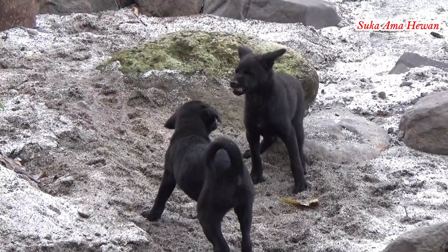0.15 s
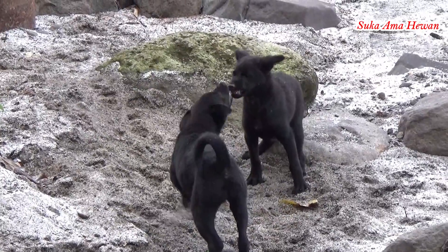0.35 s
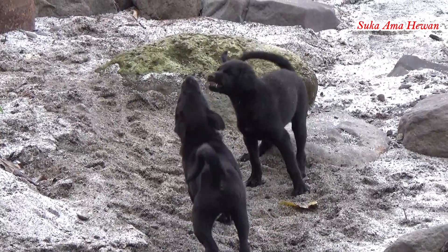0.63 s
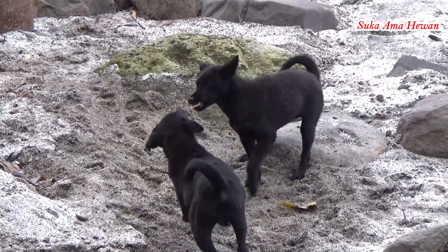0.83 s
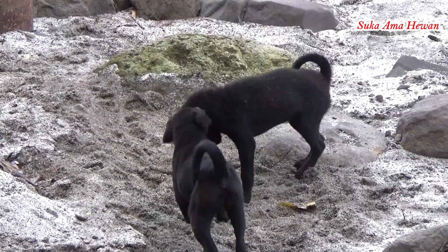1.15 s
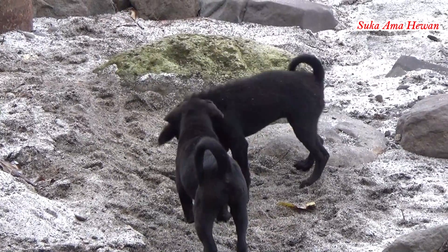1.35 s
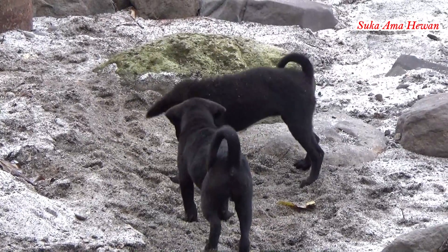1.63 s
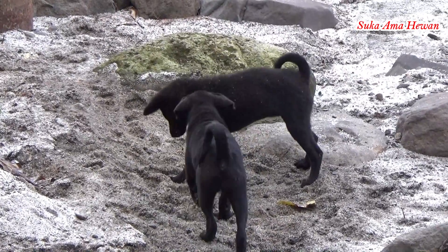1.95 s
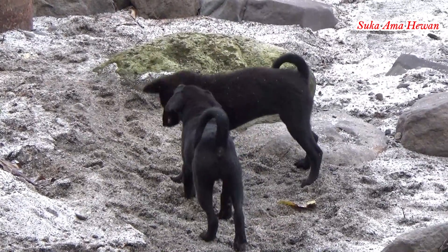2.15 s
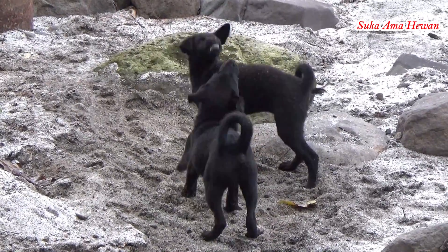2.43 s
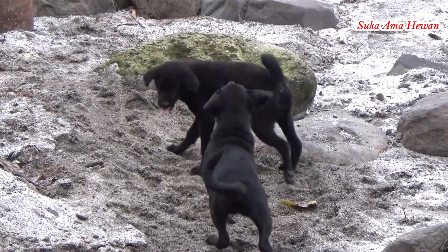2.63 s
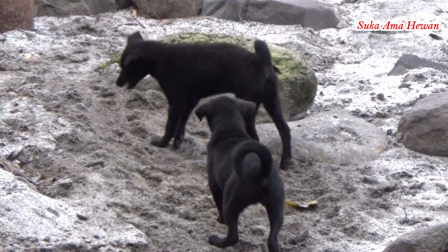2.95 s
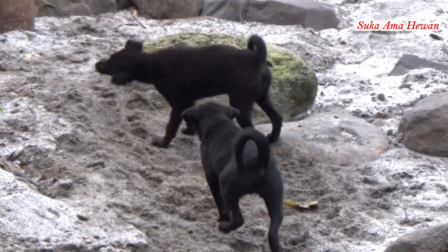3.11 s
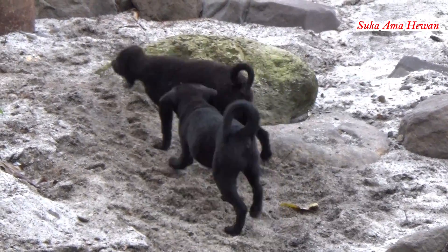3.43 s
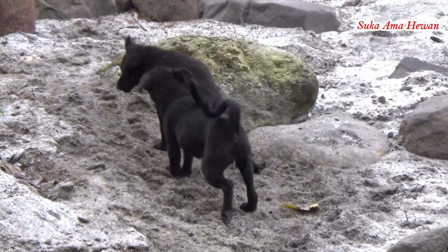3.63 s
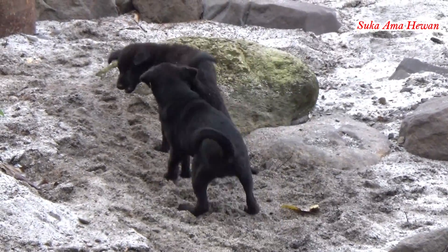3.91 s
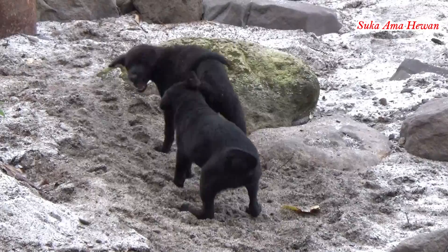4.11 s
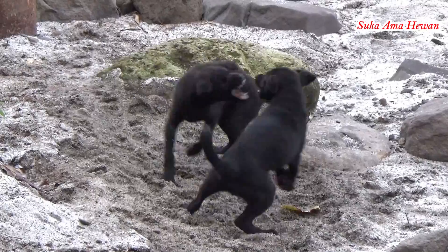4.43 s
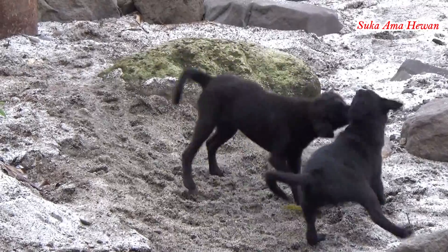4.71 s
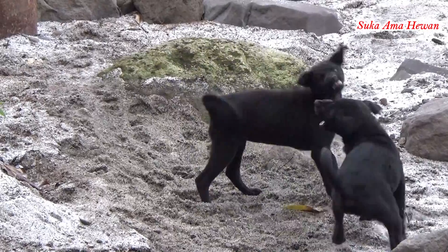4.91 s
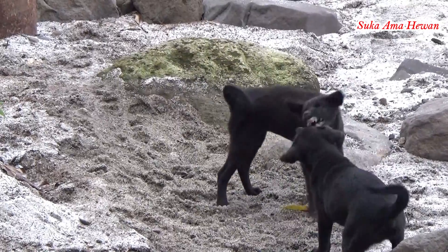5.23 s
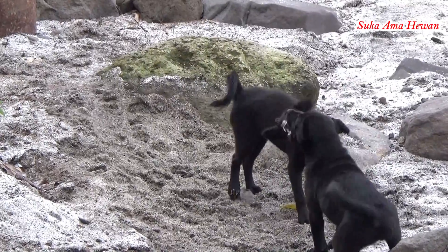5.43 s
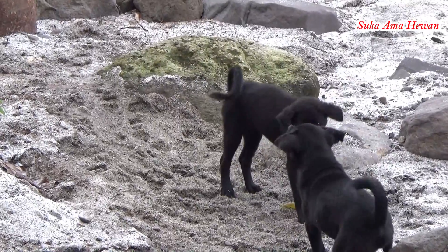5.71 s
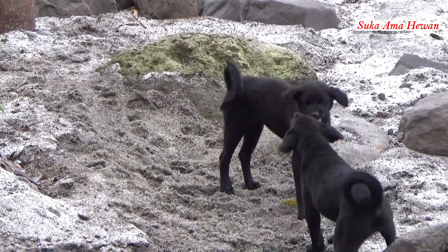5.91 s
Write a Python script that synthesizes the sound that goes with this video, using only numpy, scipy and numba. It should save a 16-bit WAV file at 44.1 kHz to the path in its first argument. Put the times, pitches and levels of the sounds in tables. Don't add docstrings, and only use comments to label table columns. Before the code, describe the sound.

Short hoarse barks burst out between throaty growls and breathy snorts as two young dogs tussle on sand, with faint distant wind and traffic.

```python
import sys
import numpy as np
from scipy import signal
from scipy.io import wavfile
from scipy.ndimage import uniform_filter1d
from numba import njit

SR = 44100
rng = np.random.default_rng(int(sys.argv[2]) if len(sys.argv) > 2 else 0)


def makeup_ratio(level_db):
    decades = np.asarray(level_db, float) / 20
    return 10 ** decades


def store_pcm(level_fs):
    pcm = np.round(np.clip(level_fs, -1, 1) * 32767).astype(np.int16)
    wavfile.write(sys.argv[1], SR, np.atleast_2d(pcm).T)


N = 267246

# f/Hz, level/dB [per Hz]
HUSH_SPECTRUM = [(15, -73), (25, -57), (86, -8), (188, -4), (227, -15), (411, -8), (445, -8), (538, -5.5),
                 (583, -3.5), (742, -6), (1080, -5), (1710, -9.5), (2180, -9.5), (7120, -15.5),
                 (15500, -21)]
# f/Hz, side minus mid level/dB
HUSH_WIDTH = [(60, -20), (110, -36), (200, -14), (380, -4.5), (700, -4), (1290, -2), (2380, -2.5),
              (4400, -8), (8120, -7.5), (15000, -20)]
# t/s, level/dB
HUSH_SWELL = [(0, 2.5), (.7, -0.5), (1.6, -0.24), (3.3, -0.55), (4.2, 0), (6.06, 3)]
# f/Hz, level/dB
MACHINE_HUM = [(719, -77.5), (194, -85.5)]
# t/s, peak level/dB, f/Hz
PAW_TICKS = [(0.4589, -48, 8400), (1.9096, -54, 2750), (1.94, -46, 2920), (2.379, -50, 1790),
             (4.2888, -34, 1960), (4.3054, -41.5, 1890), (4.3564, -36, 1810), (4.417, -41, 1810),
             (4.594, -38, 2550), (4.732, -45, 3000), (4.763, -46, 2507), (4.873, -48, 1797)]
# peak t/s, rise t/s [per 20 dB], fall t/s [per 20 dB],
# level/dB, lower hiss level/dB [re the upper]
BREATHS = [(0.0, .1, .1, -62.5, -7), (0.46, .03, .35, -66, -6), (0.9, -0.1, 0.8, -74, -1.5),
           (1.2, 0.3, 0.2, -73, -3), (1.42, 0.18, 0.14, -62.5, -2.5), (2.4, .05, 0.3, -67, -4),
           (2.7, 0.4, 0.24, -66, -4), (3.745, 1.5, 0.8, -74.5, -7), (4.31, 0.1, 0.3, -60.5, -2.5),
           (4.42, 0.06, 1, -67, 3), (4.596, -0.05, 0.18, -58.5, -12), (5.0, 0.56, 0.3, -63, -9),
           (5.345, 0.23, 0.15, -59, -4), (5.55, .5, 0.25, -63, -2.5), (5.755, 0, 0.2, -61.5, -5),
           (5.96, -0.5, 0, -67, 0)]
# f/Hz, width f/Hz, level/dB
TEETH_RESONANCES = [(8200, 950, 6), (9500, 2400, 7), (11100, 4800, -10)]
# peak t/s, rise t/s [20 dB], fall t/s [20 dB], level/dB,
# f/Hz
WHINE_TONES = [(0.54, 0.066, -0.14, -63, 1100), (1.92, .13, 0.2, -69, 1014), (3.86, .1, -0.1, -72, 649),
               (4.525, .022, -0.01, -45.5, 1020), (4.575, .05, 0, -51.5, 1003),
               (4.94, .03, 0.05, -42.5, 1150), (5.1, .06, 0, -44, 1040), (5.61, 0.072, 0, -59, 1239),
               (5.855, -0.08, -0.1, -33, 1108), (3.75, .06, 0.07, -68, 1681)]
# peak t/s, rise t/s [per 20 dB], fall t/s [per 20 dB], mouth level/dB, mouth f/Hz
GROWL_SWELLS = [(0.535, 0.1, 0.18, -62.5, 1090), (0.9, -0.03, .1, -53, 950), (1.18, 0.08, 0.1, -52.5, 1020),
                (2.383, 0, 0.06, -57.5, 1180), (2.53, 0.08, 0.17, -51.5, 1049),
                (2.68, 0.1442, 0.0952, -46.5, 920), (2.73, 0.1, 0.09, -48, 1100),
                (3.68, 0.09, 0.04, -57.5, 1100), (3.75, 0.25, 0, -62.5, 1301), (4.28, 0.09, 0.6, -55, 1230),
                (4.53, 0.29, 0.07, -50, 1090), (4.58, 0.11, -0.06, -50.5, 1100),
                (4.76, 0.73, -0.5, -64, 1100), (4.878, -0.18, -2.3, -56, 1130),
                (4.94, 0.0649, 0.22, -45, 1151), (5.03, 0.1344, 0, -44.5, 1115),
                (5.22, 0.26, 0.22, -48, 1100), (5.35, 0.09, 0.07, -37, 1134), (5.51, 0.17, 0.14, -51, 1227),
                (5.62, .3, 0, -57.5, 1212), (5.95, 0.03, -0.3, -49, 960), (6.06, .25, 4, -51.5, 1100)]
# start t/s, length up to the release t/s, mouth level/dB, pitch f/Hz, mouth f/Hz
BARK_EVENTS = [
    (0.766, 0.072, -26, 458, 1014),
    (1.068, 0.067, -31, 420, 1140),
    (2.42, 0.066, -25.5, 435, 1095),
    (3.603, 0.049, -43.5, 334.2, 1030),
    (5.048, .07, -27, 368.7, 1032),
    (5.817, .082, -21.5, 548, 1145),
]
BARK_ROUGHNESS = [.44, .4, .46, .55, .6, .44]
# top t/s [after the start], bend over the top [1/s^2]
PITCH_ARCHES = [(.04, 12), (.047, 95), (.045, 60), (.04, 15), (.05, 50), (.036, 95)]
# 2nd resonance f/Hz, 2nd level/dB, 3rd level/dB, teeth air level/dB, lip air level/dB
BARK_JAWS = [(1736, -2, -10.5, -57.5, -67.5), (1854, 1, -10, -50.5, -62), (1790, -5.5, -12, -54.5, -63),
             (1900, -8.5, -12.5, -73, -64.5), (1867, -3, -22.5, -54, -53.5),
             (1751.5, -3.5, -16.5, -45.5, -75)]

PUSH_S = 0.033


def unit(x, span_s=0.):
    power = uniform_filter1d(x ** 2, int(span_s * SR)) if span_s else np.mean(x ** 2)
    return x / np.sqrt(np.maximum(power, 1e-12))


def play(table):
    times, *columns = np.array(table).T
    return [np.interp(np.arange(N) / SR, times, column) for column in columns]


@njit
def svf(x, gs, ks):
    y, b, l = np.empty(len(x)), 0., 0.
    for i in range(len(x)):
        g, k = gs[i], ks[i]
        v = (b + g * (x[i] - l)) / (1 + g * (g + k))
        b, l, y[i] = 2 * v - b, l + 2 * g * v, k * v
    return y


def band(x, hz, width_hz, count=1):
    hz = np.clip(hz, 20, 18000)
    g = np.tan(np.pi * hz / SR) * np.ones(N)
    k = max(float(width_hz), 10.) / hz * np.ones(N)
    for _ in range(count):
        x = svf(x + 1e-18, g, k)
    return x


def walk(rate):
    k = int(SR / rate)
    held = np.repeat(rng.standard_normal(N // k + 1), k)
    return 1.3 * uniform_filter1d(uniform_filter1d(held, k), k)[:N]


def hush():
    def at(table, hz):
        table_hz, db = np.array(table).T
        return np.interp(np.log(hz), np.log(table_hz), db)

    bed = 0
    for hz in 28 * 2 ** np.arange(0, 9.3, 1 / 3):
        mid, side = (band(rng.standard_normal(N), hz, hz / 2, count=2) for _ in range(2))
        db = at(HUSH_SPECTRUM, hz) + .5 * walk(6)
        wide = makeup_ratio(at(HUSH_WIDTH, hz)) * side * np.array([[1], [-1]])
        bed = bed + makeup_ratio(db) * (mid + wide)
    hum = sum(makeup_ratio(db) * unit(band(rng.standard_normal(N), hz, 30)) for hz, db in MACHINE_HUM)
    return makeup_ratio(-62.5 + play(HUSH_SWELL)[0]) * unit(bed) + hum


@njit
def walls(x, lags, gain, damp):
    line, soft, out = np.zeros((8, 4096)), np.zeros(8), np.zeros((2, len(x)))
    for i in range(len(x)):
        total = 0.
        for k in range(8):
            soft[k] += (1 - damp) * (gain[k] * line[k, (i - lags[k]) & 4095] - soft[k])
            total += soft[k]
            out[k % 2, i] += soft[k]
        for k in range(8):
            line[k, i & 4095] = x[i] + soft[k] - total / 4
    return out


def grit():
    out, t = np.zeros(N), np.arange(600) / SR
    scatter = rng.standard_normal((len(PAW_TICKS), 600))
    for (s, db, hz), sand in zip(PAW_TICKS, scatter):
        i = int(s * SR)
        ring = np.exp(-t / 0.0011) * np.sin(2 * np.pi * hz * t)
        out[i:i + 600] += makeup_ratio(db) * (ring + 0.4 * np.exp(-t / 0.004) * sand)
    return band(out, 4700, 11500, count=2)


def swells(rows, order=1):
    s, rise_s, fall_s, db, last = np.array(rows, np.float32).T[:, :, None]
    since = np.arange(N, dtype=np.float32) / SR - s
    rising, falling = -since / np.maximum(rise_s, .004), since / np.maximum(fall_s, .004)
    drop = 20 * np.where(since < 0, rising, falling) ** order
    top = np.argmax(db - drop, axis=0)
    drop = np.minimum(drop[top, np.arange(N)], 90.)
    return db[top, 0] - drop, drop, uniform_filter1d(last[top, 0], SR // 100)


def effort(late_s, push_db, release_db_per_s):
    events = np.array(BARK_EVENTS)
    t = np.arange(N) / SR - late_s
    which = np.maximum(np.searchsorted(events[:, 0] - .02, t) - 1, 0)
    since = t - events[which, 0]
    past = np.maximum(since - events[which, 1], 0)
    snap_db = 40 * np.minimum(since / 0.014, 0)
    pushing_db = push_db * np.clip(1 - since / PUSH_S, 0, 1)
    return which, since, past, np.maximum(snap_db + pushing_db - release_db_per_s * past, -90)


def breath():
    def air():
        return makeup_ratio(2.1 * walk(150)) * rng.standard_normal(N)

    level_db, _, lower_db = swells(BREATHS)
    jaws = np.array(BARK_JAWS)
    which, _, _, under_db = effort(0.0063, -13.5, 486)
    blown = makeup_ratio(jaws[which, 3] + under_db)
    early, _, _, early_db = effort(0, -1.5, 630)
    puffed = makeup_ratio(jaws[early, 4] + early_db)
    lips_hz = 5220 * np.exp(0.11 * walk(8))
    teeth = 0
    for hz, width_hz, db in TEETH_RESONANCES:
        teeth = teeth + makeup_ratio(db) * band(air(), hz * np.exp(0.067 * walk(40)), width_hz, count=2)
    lips = unit(band(air(), lips_hz, 1200, count=2))
    return (makeup_ratio(level_db) + blown) * unit(teeth) + (makeup_ratio(level_db + lower_db) + puffed) * lips


def whines():
    db, drop, hz = swells(WHINE_TONES, order=2)
    hz = hz * (1 - .0015 * np.minimum(drop, 20))
    level = makeup_ratio(db + 5.5 + 2.7 * walk(60))
    return level * np.sin(2 * np.pi * np.cumsum(hz * (1 + .015 * walk(55))) / SR)


@njit
def folds(hz, rough, jitter, shimmer):
    pulses, phase, p, k = np.zeros(len(hz) + 1), np.empty(len(hz)), 0., 0
    for i in range(len(hz)):
        step = hz[i] * np.exp(rough[i] * jitter[k]) / SR
        p += step
        if p >= 1:
            p, k = p - 1, k + 1
            size = np.exp(rough[i] * shimmer[k])
            pulses[i] += size * p / step
            pulses[i + 1] += size * (1 - p / step)
        phase[i] = p
    return pulses[:-1], phase


def larynx(hz, rough, jitter, shimmer, puff, bright):
    chance = rng.standard_normal((N // 40, 2)).T
    pulses, phase = folds(hz, rough, jitter * chance[0], shimmer * chance[1])
    air = rng.standard_normal(N)
    air = air + bright * np.diff(air, prepend=0)
    source = unit(pulses, .03) + rough * unit(np.exp(-phase / puff)) * air
    lag = int(0.000923 * SR)
    return source + 0.05 * np.roll(source, lag)


def throat(source, controls, widths_hz, hold_s, top_db):
    mouth_db, second_db, third_db, *moving_hz = controls
    source = signal.sosfilt(signal.butter(7, (675, 4450), "band", fs=SR, output="sos"), source)
    mouth, second, third, top = (unit(band(source, hz, width_hz, count=2), hold_s)
                                 for hz, width_hz in zip(moving_hz, widths_hz))
    cheek = makeup_ratio(-14) * unit(band(source, 760, 180, count=2), hold_s)
    upper = makeup_ratio(2.9 * walk(90)) * third - makeup_ratio(top_db + 0.73 * walk(70)) * top
    return makeup_ratio(mouth_db) * (mouth - cheek - makeup_ratio(second_db) * second + makeup_ratio(third_db) * upper)


def growls():
    mouth_db, _, mouth_hz = swells(GROWL_SWELLS)
    weak = np.clip(-52 - mouth_db, -15, 18)
    gape = mouth_hz - 1100
    second_db = -7.5 + 0.13 * weak + 0.0395 * gape
    third_db = -15 + 0.55 * weak + 0.0308 * gape
    chest_db = -13.5 + 0.74 * weak
    second_hz = 1848 * np.exp(0.042 * walk(7))
    third_hz = (2815 + 1.5 * gape) * np.exp(0.042 * walk(7))
    flap_hz = 150 * np.exp(.12 * walk(11))
    source = larynx(flap_hz, np.full(N, .9), jitter=.3, shimmer=0.73, puff=1.0, bright=6.7)
    chest = band(source, 184.5, 112, count=2) + 0.84 * band(source, 326, 200, count=2)
    mouth_hz, second_hz = (hz * np.exp(0.049 * walk(30)) for hz in (mouth_hz, second_hz))
    controls = (mouth_db, second_db, third_db, mouth_hz, second_hz, third_hz, 4000)
    voice = throat(source, controls, (330, 394, 670, 1100), hold_s=0.086, top_db=-8.5)
    return voice + makeup_ratio(mouth_db + chest_db) * unit(chest, 0.072)


def barks():
    which, since, past, under_db = effort(0, -12, 736)
    db, hz, mouth_hz = np.array(BARK_EVENTS)[which, 2:].T
    second_hz, second_db, third_db = np.array(BARK_JAWS)[which, :3].T
    top_s, bend = np.array(PITCH_ARCHES)[which].T
    since, past = np.clip(since, 0, .12), np.minimum(past, .1)

    hz = hz * np.exp(-bend * np.minimum(since - top_s, .06) ** 2 - 1.5 * past)
    mouth_hz = mouth_hz * np.exp(-4.2 * past - 0.93 * bend * np.clip(since - top_s, 0, .06) ** 2)
    top_hz = 4150 * np.exp(-1.6 * since)

    mouth_db = db + under_db - 97 * np.clip(since - PUSH_S, 0, .05)
    second_db = second_db + 82 * (since - .05)
    third_db = third_db + 74 * (since - .05) - 12 * np.exp(-since / 0.016) + 223 * np.minimum(past, .04)

    low_db = -54 + 0.32 * (db + 27.5) + 82 * (since - .07)
    low_db = low_db + np.where(since > 0, 0.34 * under_db, under_db)

    rough = np.take(BARK_ROUGHNESS, which) * (.6 + 9 * since)
    hz = hz * np.exp(.08 * rough * walk(120))
    source = larynx(hz, rough, jitter=.08, shimmer=.5, puff=.5, bright=2.6)
    rumble = band(rng.standard_normal(N), 402, 300, count=2)
    low = unit(band(source, hz, 150, count=2)) + 0.93 * unit(rumble)
    controls = (mouth_db, second_db, third_db, mouth_hz, second_hz, 2920, top_hz)
    voice = throat(source, controls, (410, 368, 850, 820), hold_s=.045, top_db=-7.5)
    return voice + makeup_ratio(low_db) * unit(low, 0.13)


def scene():
    dogs = barks() + growls() + whines() + breath() + grit()
    lags, tail_t60_s = rng.integers(500, 2600, 8), .36
    tail = walls(dogs + 1e-18, lags, makeup_ratio(-60 * lags / SR / tail_t60_s), .12)
    side = 0.12 * band(dogs, 630, 460) - 0.13 * band(dogs, 3400, 2900)
    side = side + 0.12 * np.roll(band(dogs, 6100, 9000, count=2), 30)
    return dogs + side * np.array([[1], [-1]]) + makeup_ratio(-18.5) * (tail + .5 * tail[::-1]) + hush()


def low_pass(x):
    return signal.sosfilt(signal.butter(12, 15690, fs=SR, output="sos"), x)


def record(dry):
    mix = signal.sosfilt(signal.ellip(8, .2, 60, 15600, fs=SR, output="sos"), dry)
    return low_pass(mix)


dry = scene()
out = record(dry)
store_pcm(out)
```